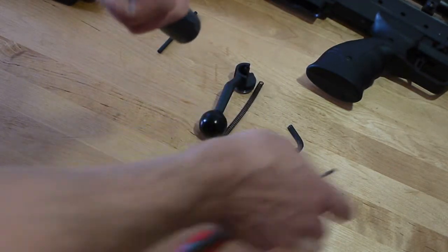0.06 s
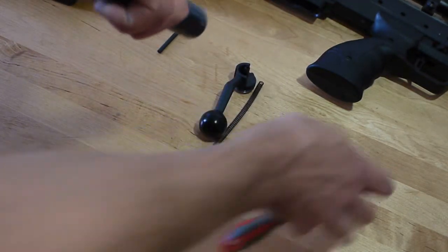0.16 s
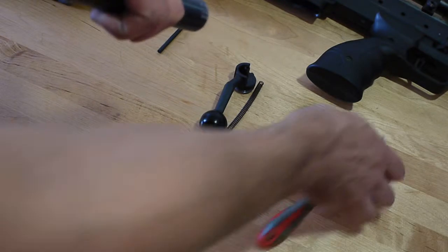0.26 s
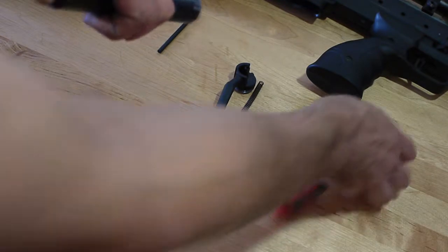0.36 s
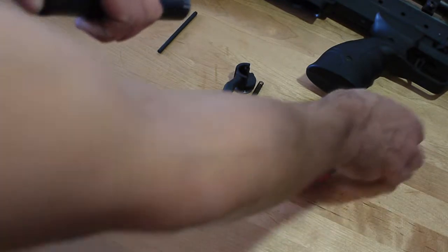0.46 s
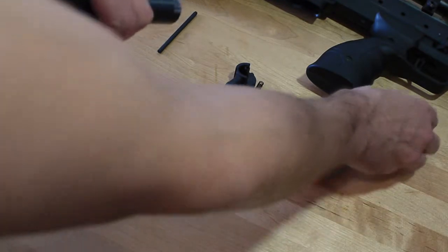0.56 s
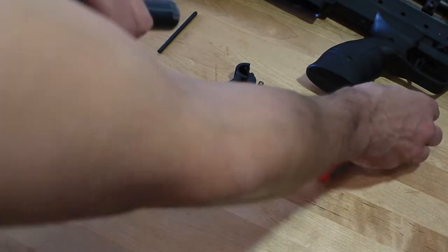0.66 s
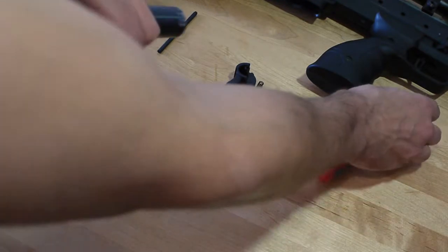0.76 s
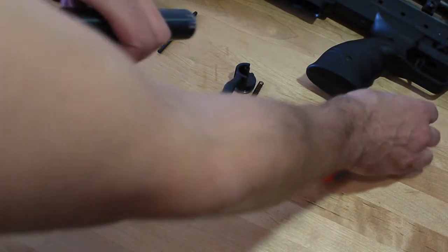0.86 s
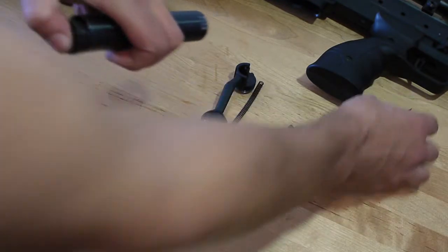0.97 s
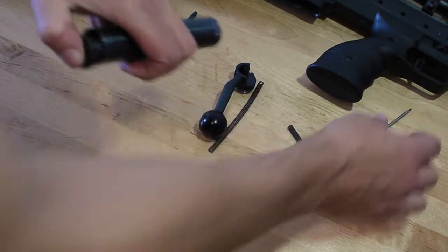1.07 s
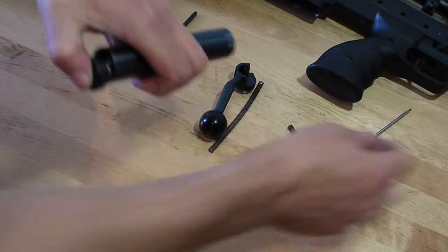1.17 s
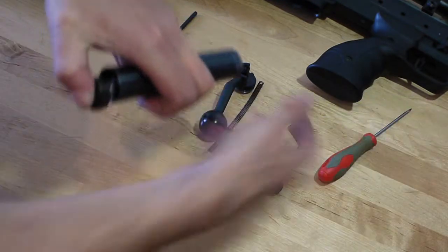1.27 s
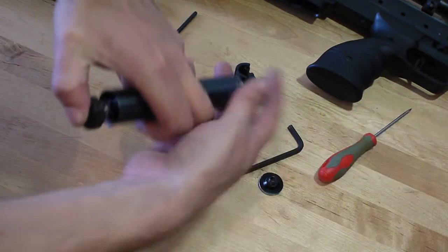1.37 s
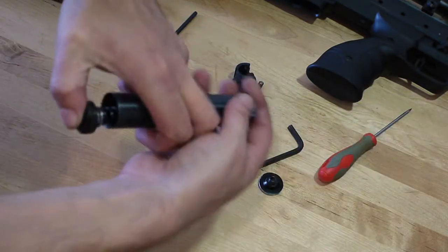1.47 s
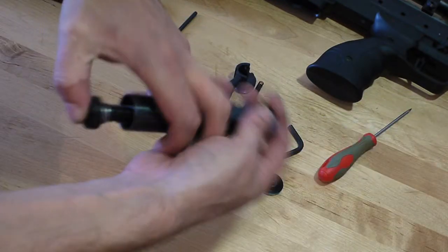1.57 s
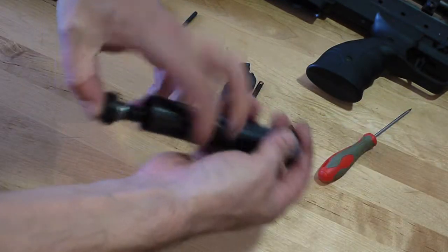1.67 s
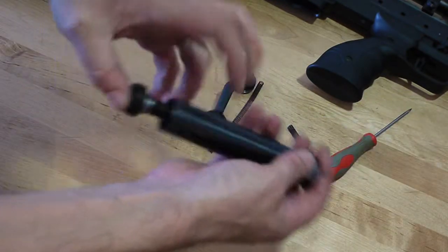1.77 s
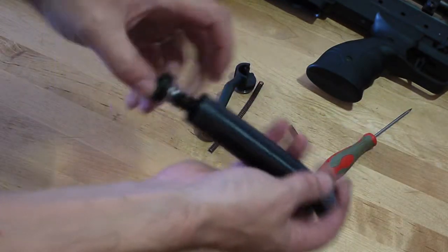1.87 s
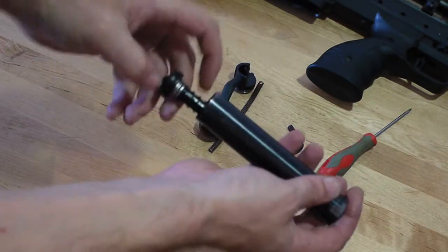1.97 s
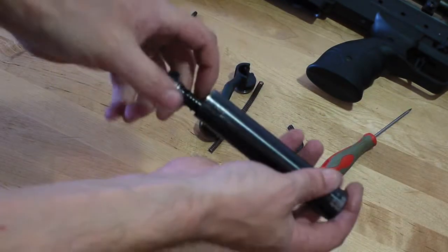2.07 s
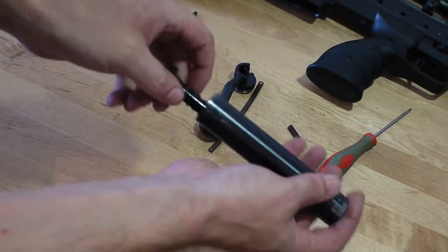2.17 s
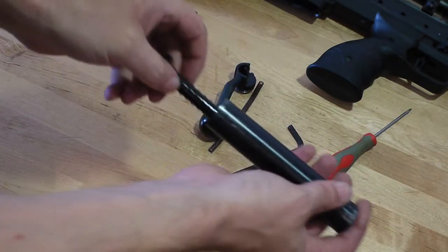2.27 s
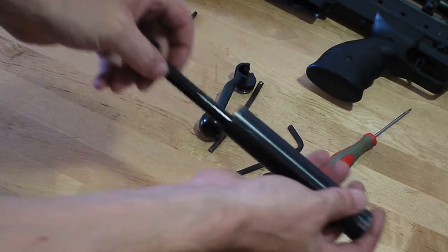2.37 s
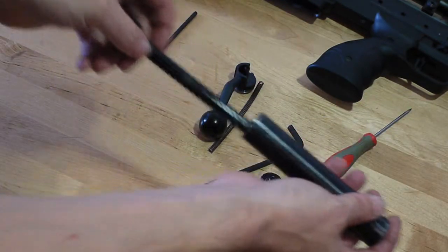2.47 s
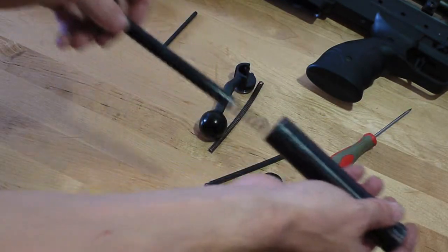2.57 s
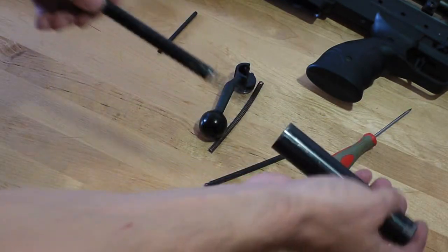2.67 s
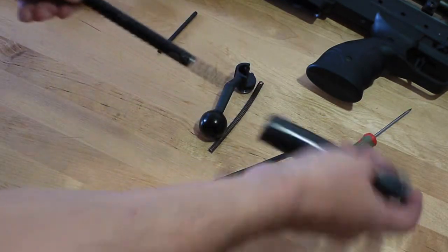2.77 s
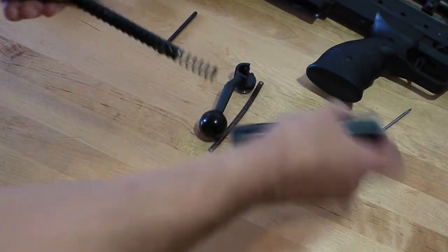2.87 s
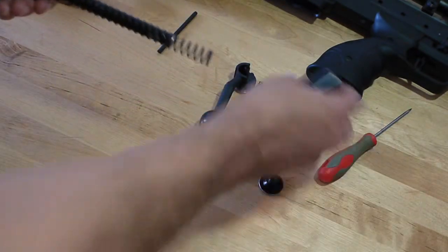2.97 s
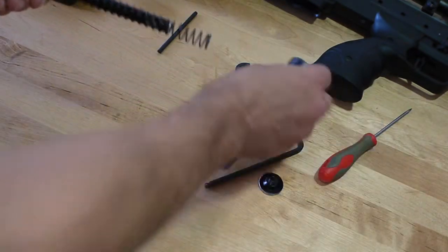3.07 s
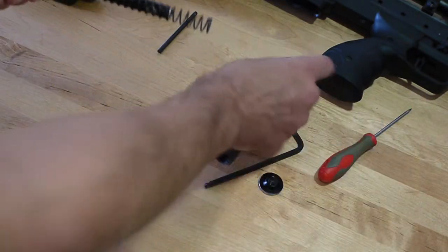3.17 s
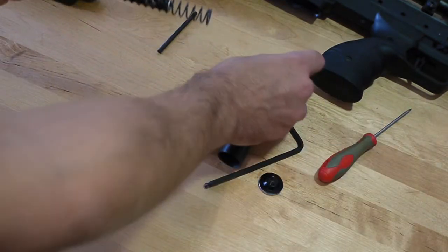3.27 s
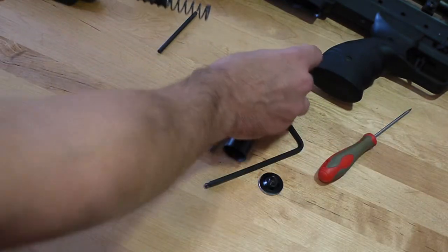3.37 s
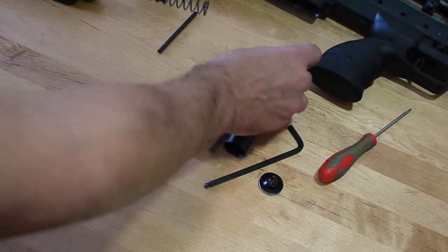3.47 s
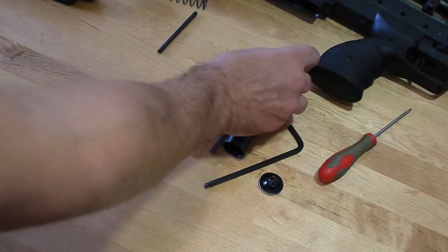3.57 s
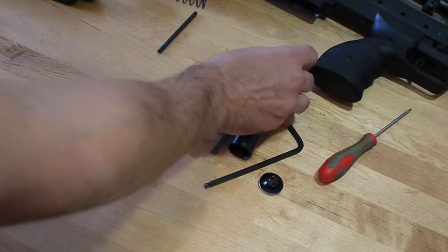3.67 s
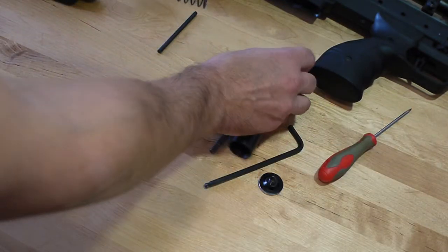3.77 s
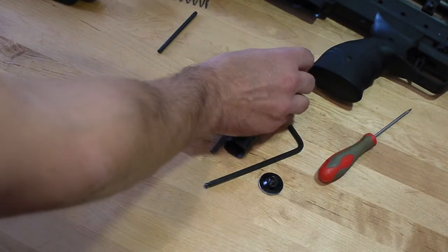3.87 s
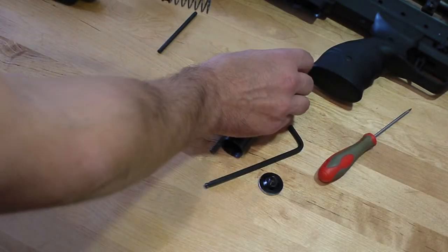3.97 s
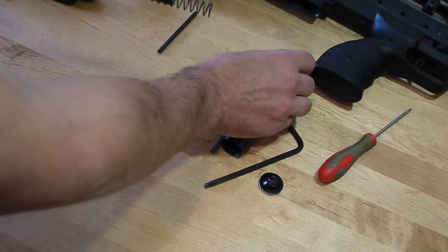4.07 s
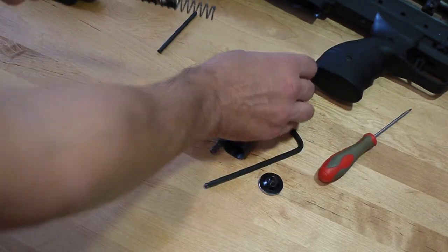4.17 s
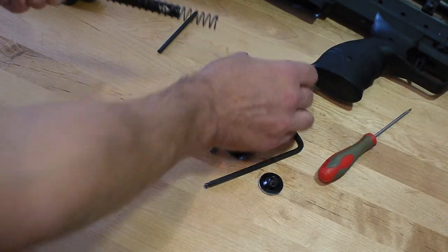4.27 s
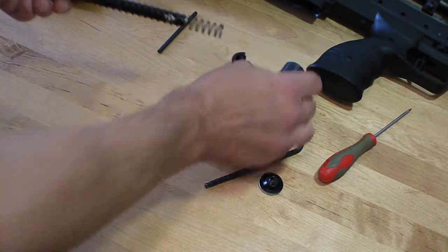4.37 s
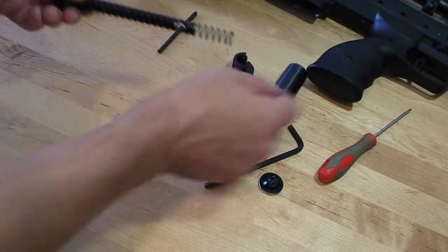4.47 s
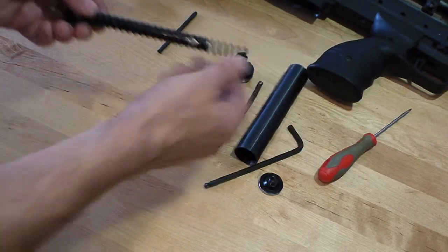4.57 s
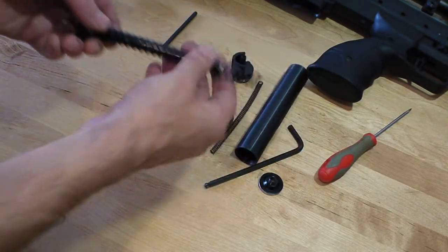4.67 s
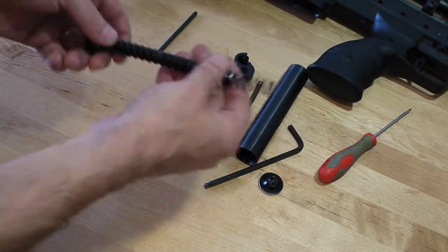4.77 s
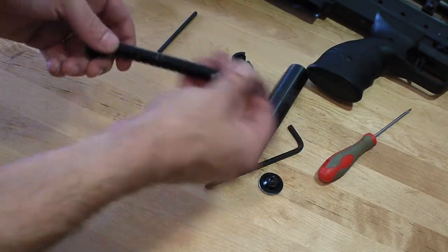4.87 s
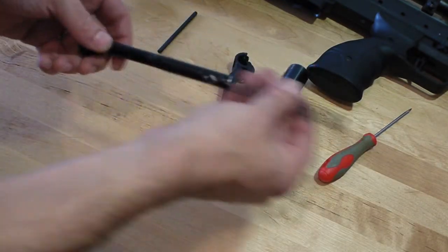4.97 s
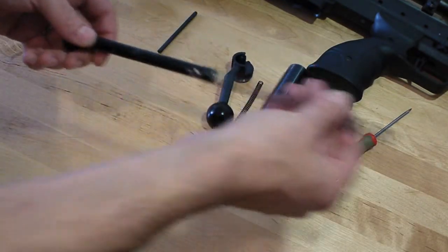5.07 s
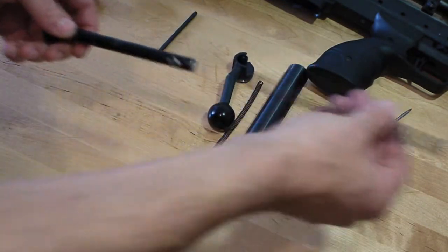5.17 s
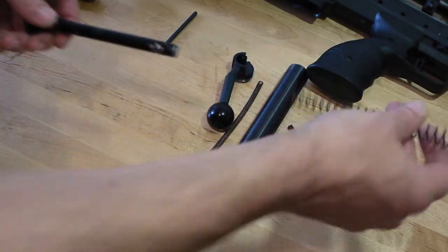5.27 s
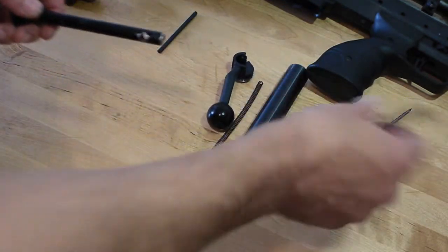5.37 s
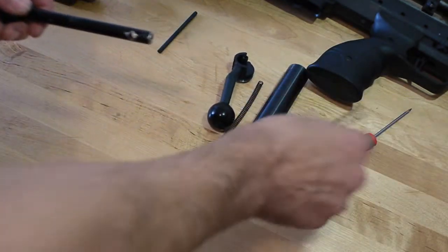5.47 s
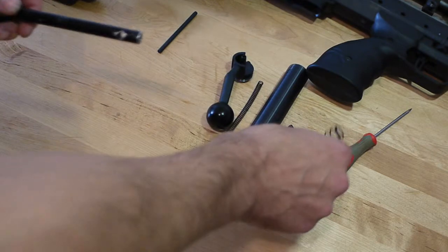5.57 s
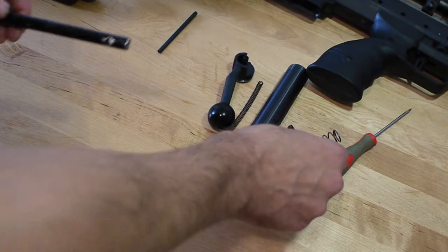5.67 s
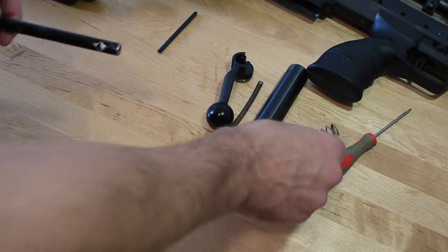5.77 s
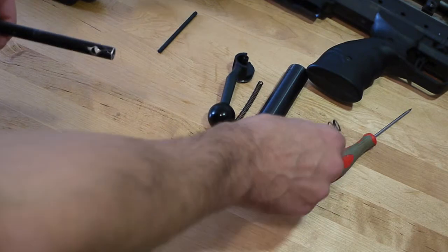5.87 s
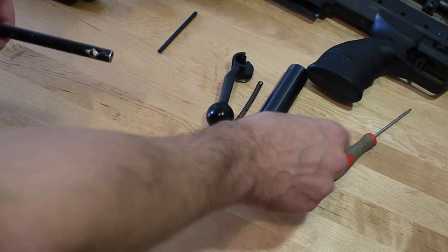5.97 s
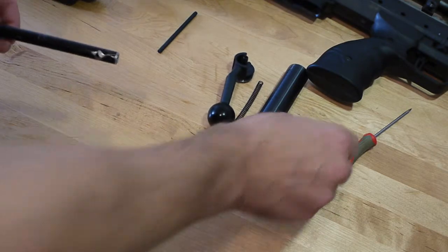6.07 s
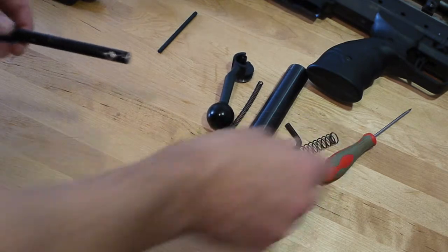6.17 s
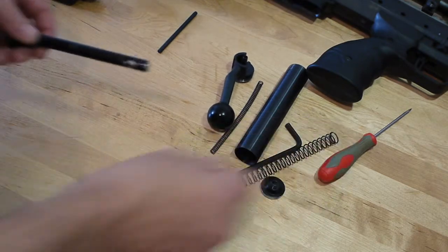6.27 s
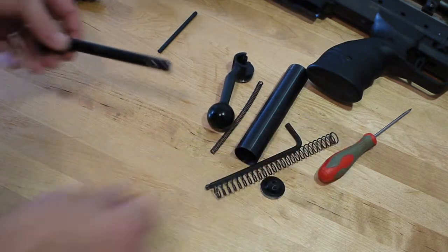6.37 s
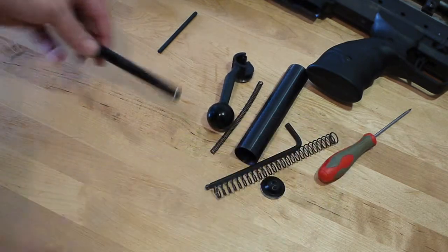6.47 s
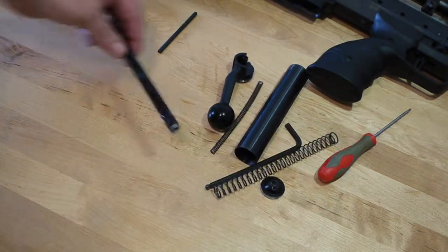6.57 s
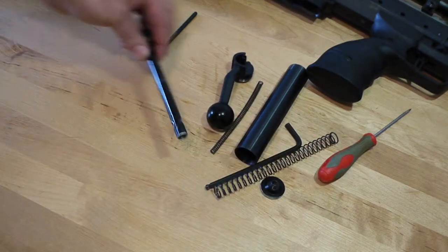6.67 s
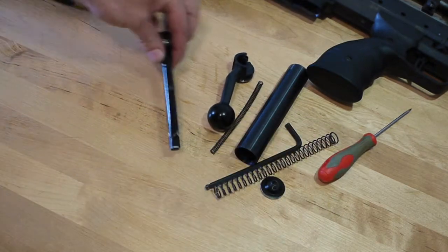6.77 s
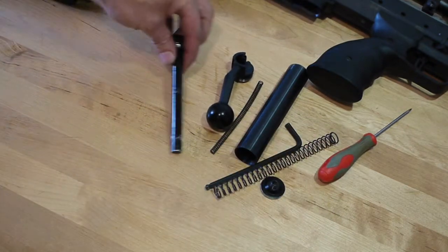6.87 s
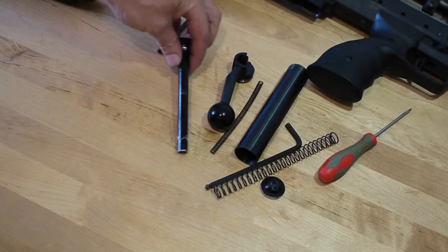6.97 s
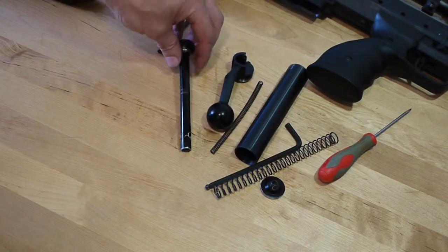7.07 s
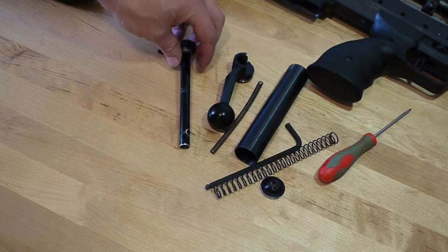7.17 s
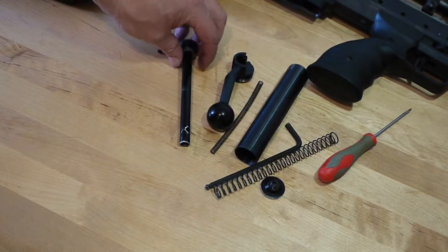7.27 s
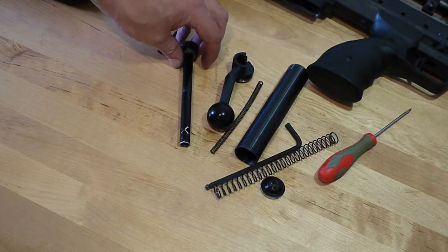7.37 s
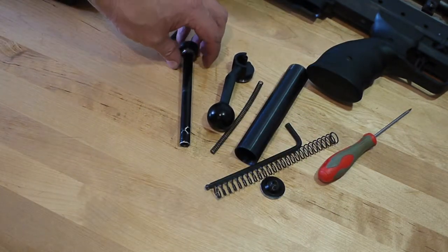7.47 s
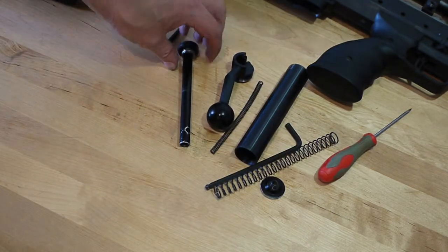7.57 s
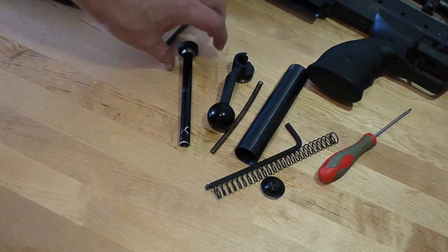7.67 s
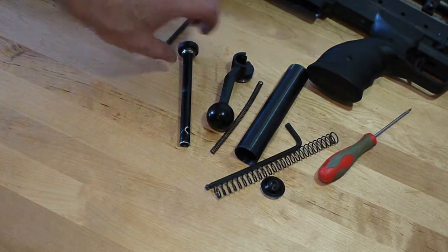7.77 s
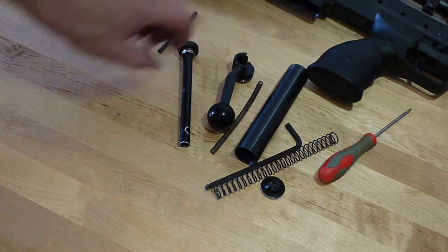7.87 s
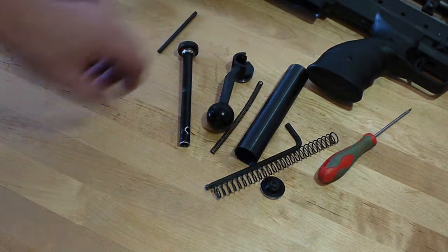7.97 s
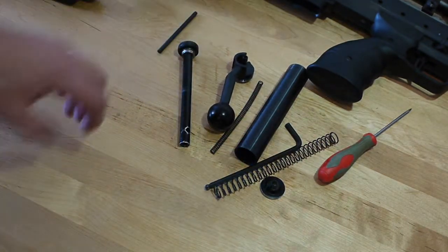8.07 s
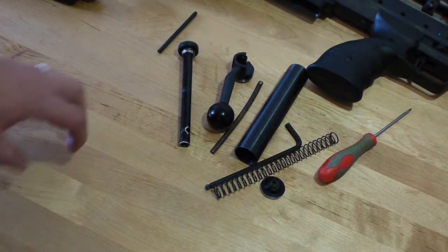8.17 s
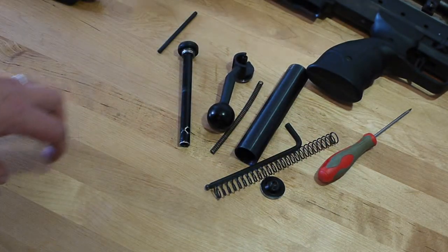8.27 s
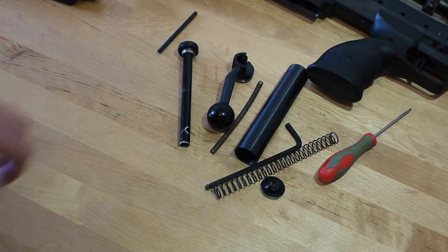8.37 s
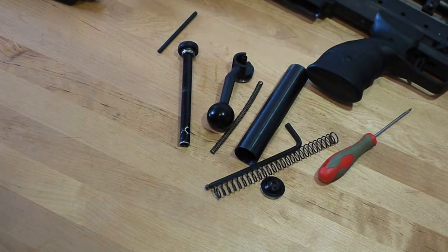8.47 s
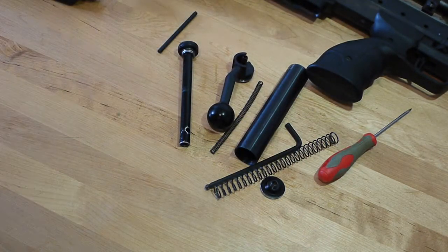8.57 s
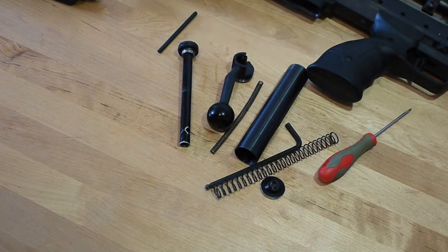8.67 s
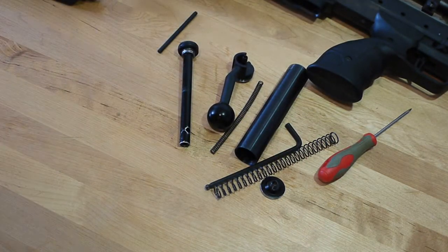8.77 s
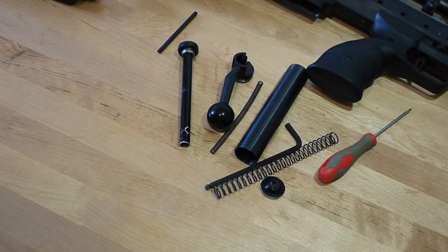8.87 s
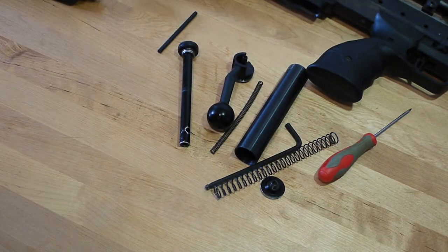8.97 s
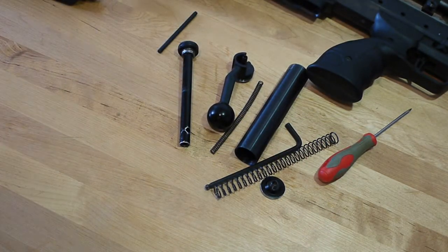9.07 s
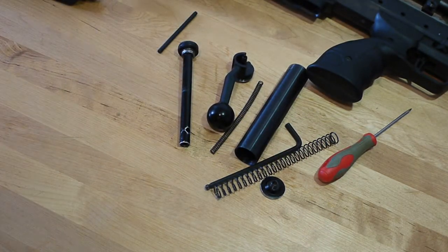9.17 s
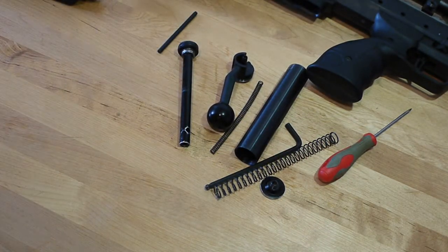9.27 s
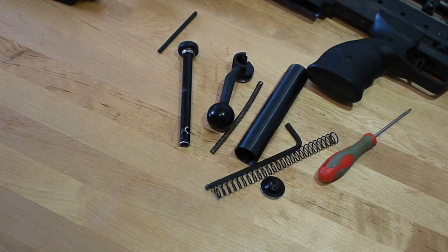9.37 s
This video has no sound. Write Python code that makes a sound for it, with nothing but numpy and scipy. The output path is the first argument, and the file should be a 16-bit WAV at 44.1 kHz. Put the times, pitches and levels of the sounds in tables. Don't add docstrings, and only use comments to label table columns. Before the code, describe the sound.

A small camera microphone with a narrow, slightly dull band and steady hiss picks up parts handled over a wooden table. Hard knocks with a short hollow ring open it, metallic snaps and high tube ringing follow, then a loud double knock of the tube, a rattling spring and quieter rod taps. Sleeve rustle, skin rubbing and tiny ticks fill the gaps, with short room reverberation.

```python
import sys
import numpy as np
from scipy import signal
from scipy.io import wavfile
from scipy.ndimage import uniform_filter1d

SR = 44100
rng = np.random.default_rng(int(sys.argv[2]) if len(sys.argv) > 2 else 0)


def voltage_ratio(decibels):
    exponent = np.asarray(decibels, float) / 20
    return 10 ** exponent


def put_to_file(sound):
    columns = np.atleast_2d(sound).T
    safe = np.clip(columns, -1, 1)
    whole_steps = np.round(safe * 32767)
    wavfile.write(sys.argv[1], SR, whole_steps.astype(np.int16))


N = 415863
STROKE_ENDS_DB = -18.5


def evened(x):
    return x / np.sqrt(np.mean(x ** 2) + 1e-20)


def matched(x, model):
    return x * np.linalg.norm(model) / np.linalg.norm(x)


def read(points, hz):
    f, value = np.transpose(points)
    return np.interp(np.log(hz + 1), np.log(f + 1), value)


def add(mix, start_s, sound):
    part = mix[round(start_s * SR):][:len(sound)]
    part += sound[:len(part)]


def band(x, low_hz, high_hz):
    sos = signal.butter(3, [low_hz, high_hz], "bandpass", fs=SR, output="sos")
    return evened(signal.sosfilt(sos, x))


def click(low_hz, high_hz):
    impulse = np.zeros(SR // 3)
    impulse[0] = 1
    return band(impulse, low_hz, high_hz)


def random_slips(size, per_s):
    return rng.standard_normal(size) * (rng.random(size) < per_s / SR)


def slow_wander(size, width):
    noise = rng.standard_normal((size, 2))
    return evened(uniform_filter1d(uniform_filter1d(noise, width, 0), width, 0)).T


def arch(length_s, top):
    size = length_s * SR
    return np.interp(np.arange(round(size)), [0, np.clip(top, .01, .99) * size, size], [-1, 0, 1])


def modes(table, size=SR // 3):
    hz, db, t60_s = np.transpose(table)[:, :, None]
    t = np.arange(size) / SR
    fade_out = np.minimum((size / SR - t) * 20, 1)
    dying = voltage_ratio(db - 60 * t / np.clip(t60_s, .004, .6))
    return dying * np.sin(2 * np.pi * hz * t) * np.minimum(t * hz, 1) ** 2 * fade_out


def rattle(length_s, first, per_s):
    t = np.arange(4000) / SR
    contacts = random_slips(len(t), per_s) * np.exp(-t / max(length_s, 3e-4))
    contacts[0] = first
    return contacts


def causal(gain_db):
    log_gain = np.log(voltage_ratio(np.concatenate([gain_db, gain_db[-2:0:-1]])))
    return np.fft.ifft(np.exp(np.conj(signal.hilbert(log_gain)))).real[:len(gain_db)]


def knocks(clear_db=-9, per_s=2000, room_tilt=-0.61, thin_db=-7, bounce_db=-3, count=170):
    # (start_s, peak_db, hardness_db per octave, rattle_s, first contact share 0-1)
    key = ([(100, -37), (314, -15), (366, -30), (450, 0.5), (872, -2.5), (1010, -5.5), (2600, -12.5),
           (7200, -49)], [(453, -12, 0.45), (520, -7, 0.14), (864, -3.5, 0.4), (1066, -21, 0.68),
           (1326, -15, 0.21), (1437, -15, 0.44), (1502, -15.5, 0.36), (1695, -9.5, .25), (1874, -19, 0.36),
           (2110, -19.5, 0.32), (2690, -24, 0.8)], [(0.295, -9.5, 4, 0.0038, 0.64),
           (0.313, -14, -2, 0.0045, 0.54), (0.361, -23.5, 5.5, 0.0036, 0.9)])
    handle_nudge = ([(120, -69), (200, -27), (436, -25), (529, -15), (623, 20), (2000, -36), (2600, -62),
                    (4400, -120)], [(425, 5.4, 0.37)], [(0.651, -48.5, -0.5, 0.018, 0.36),
                    (0.689, -53.5, 14, 0.015, 0.065)])
    handle = ([(131, -7), (165, -31), (442, -8), (538, -21), (643, -0.5), (2150, -14.5), (3000, -31),
              (7200, -54)], [(440, -8, 0.25), (870, -2, 0.26), (1400, -5, 0.38), (1096, -4.5, 0.3),
              (1770, -10, 0.39), (750, -5.5, 0.13), (1026, -22, .29), (1454, -3.5, 0.28), (1614, -11, 0.22),
              (1940, -7.5, .21)], [(0.848, -23, 2.5, 0.0059, 0.89), (0.864, -18.5, 1.5, 0.0031, 0.44),
              (0.877, -19.5, 0.1, 0.024, 0.89)])
    tube_end = ([(230, -36.5), (450, 2), (538, -8), (1050, -21.5), (1450, -20.5), (2200, -32), (3500, -34),
                (7200, -54)], [(450, -3, 0.45), (554, 1.5, 0.17), (646, -5, 0.29), (1418, -2, 0.24),
                (1020, -18, .3), (1590, -23.5, 0.35), (2697, -17, 0.27), (3560, -16, .12)],
                [(3.346, -39.5, -4, 0.008, 0.8), (3.361, -32, -1, 0.011, 0.03),
                (3.377, -28.5, 0, 0.049, 0.2), (3.427, -30.5, -4, 0.02, 0.5)])
    tube_nudge = ([(120, -59), (200, -18.5), (445, -7), (1030, -16), (1120, -35), (2000, -20), (2600, -61),
                  (4400, -120)], [(437, 3.4, 0.42)], [(3.778, -48.5, 0.34, 0.0081, 0.16),
                  (3.811, -46.5, -1, 0.015, 0.092)])
    tube_flat = ([(138, -21), (200, -25.5), (643, -1), (1100, -16), (1460, -4), (2000, -9), (2700, -21),
                 (7200, -45.5)], [(458.4, -6.5, 0.26), (854, -6.5, 0.12), (950, -10, .3), (1141, -16, 0.3),
                 (1372, -13, 0.33), (1397, -7.5, 0.3), (1489, -7, 0.25), (1530, -6, 0.27),
                 (1570, -20, 0.245), (1705, -17, 0.14), (1803, -22.5, .25), (1900, -6.5, .22),
                 (2186, -19, 0.32)], [(3.934, -19, -3, 0.02, 1), (3.966, -17.5, 3.7, 0.0067, 0.67),
                 (3.9775, -9, -0.5, 0.013, 0.62), (3.994, -15, 1.5, 0.019, 0.43)])
    tube_let_go = ([(140, -3.5), (230, -4.5), (299, 6), (366, 3.5), (700, 5.5), (1060, -9), (1500, -8.5),
                   (3500, -43)], [(851, -7, 0.11), (1383, -11, 0.29), (1510, -14, 0.34)],
                   [(4.581, -30, -0.052, 0.0056, 0.47), (4.597, -36.5, 2.6, 0.0066, 0.65)])
    spring = ([(376, -24.5), (442, -1.5), (560, -14.5), (826, -9), (2900, -8), (4400, -12), (5600, -13.5),
              (7200, -29)], [(827, -13.5, 0.35), (1500, -8.5, 0.24), (2696, -7, 0.19), (2810, -18, .25),
              (3208, -6, 0.14), (4260, -23, .1), (5259, -9.5, .15), (6266, -19, .1)],
              [(6.0475, -16, -0.7, 0.018, 0.27), (6.055, -13.5, 9, 0.0091, 0.88),
              (6.078, -17, -2.3, 0.012, 0.49), (6.106, -17.5, 0.5, 0.035, 0.47),
              (6.123, -22.5, -3, 0.014, 0.83), (6.16, -27, -1.5, 0.026, 0.66),
              (6.194, -28.5, -2, 0.042, 0.41), (6.224, -29, 2, 0.061, 0.5)])
    rod_end = ([(397, -18.5), (442, 5), (620, -16.5), (1440, -3), (2550, -20.5), (3900, -26), (4600, -33),
               (7200, -45)], [(445, -25, 0.73), (854, -11, 0.35), (1410, -0.5, 0.25), (1513, -3.5, 0.34),
               (740, -10, 0.34), (927, -6.5, 0.28), (1334, -4, 0.29), (2067, -18, .23)],
               [(6.935, -31, 1.1, 0.014, 0.96), (6.956, -31.5, 0.76, 0.016, 0.99),
               (6.968, -29, -0.86, 0.018, 0.34)])
    rod_flat = ([(100, -26.5), (769, -12.5), (856, -12.5), (1080, -15), (1660, -14), (2170, -27),
                (3990, -43), (7200, -50)], [(866, 0, 0.35), (1440, -4, 0.4), (1900, -27.5, 0.31),
                (666, -1.5, .1), (1125, -34, .15), (1580, -10, 0.24), (1830, -17, .26)],
                [(7.379, -29.5, -2.1, 0.0084, 0.55), (7.399, -29.5, -1.1, 0.0056, 0.55)])
    # pitch_hz, t60_s
    wood = [(140, 0.095), (450, 0.11), (1500, 0.026), (4000, 0.0063)]
    # pitch_hz, level_db
    table_colour = [(150, 7.5), (240, -3.5), (303, 6), (365, -5.5), (850, 2.5), (1060, 1), (1450, 2),
                    (2100, 1.9)]
    # pitch_hz, level_db, t60_s
    table_modes = [(305.5, -3.5, 0.14), (641, -10, 0.42), (1160, -11.5, 0.16), (1580, -12, 0.13),
                   (1753, -14.5, 0.23), (1976, -6, 0.6)]
    table_sway = (138, -8.5, 0.21)
    pair_share, pair_db = .013, -9
    laid_down = [key, handle_nudge, handle, tube_end, tube_nudge,
                 tube_flat, tube_let_go, spring, rod_end, rod_flat]

    near, far = np.zeros(N), np.zeros((3, N))
    fine_hz = np.fft.rfftfreq(4096, 1 / SR)
    for colour, clear, contacts in laid_down:
        shared = [(f, db + read(colour, f), t60) for f, db, t60 in table_modes + [table_sway]]
        pairs = [(f * (1 + pair_share * (-1) ** m), db + pair_db, t60 * 1.15)
                 for m, (f, db, t60) in enumerate(clear)]
        tones = clear + pairs + shared
        chime, chime_hz = modes(tones), np.transpose(tones)[0]
        for k, (start_s, peak_db, hardness, length_s, first) in enumerate(contacts):
            hz = np.geomspace(110, 7300, count) * rng.uniform(.99, 1.01, count)
            t60_s = read(wood, hz)
            train = rattle(length_s, first, per_s)
            share_db = read(colour, hz) + read(table_colour, hz) + hardness * np.log2(hz / 1000)
            share_db += 10 * np.log10(hz / t60_s)
            if k > 0:
                share_db += bounce_db * np.log2(np.maximum(hz / 2500, 1))
            body = rng.choice([-1, 1], count) @ modes(np.transpose([hz, share_db, t60_s]), size=4000)
            ring = signal.fftconvolve(train, body)
            scale = voltage_ratio(peak_db) / abs(ring).max()
            add(near, start_s, scale * ring)

            soft_db = .6 * min(hardness, 0) * np.log2(np.maximum(chime_hz / 700, 1))
            add(near, start_s, voltage_ratio(peak_db + clear_db + soft_db) @ chime)

            smooth_db = read(colour, fine_hz) + read(table_colour, fine_hz) + thin_db * (fine_hz < 200)
            smooth_db += (hardness + room_tilt) * np.log2(fine_hz / 1000 + 0.079)
            smooth = causal(np.maximum(smooth_db, -100))
            add(far[k % 3], start_s, scale * matched(smooth, ring))
    return near + voltage_ratio(-2) * room(far)


def ticks(out, far, clear_db=-4, per_s=1500, spot_db=3):
    # pitch_hz, level_db, t60_s
    boards = [(430, 9, 0.38), (640, 3, 0.14), (839, 5, 0.19)]
    table_top = [(1400, 1, 0.045), (1997, 5.5, 0.054)]
    contact_crack = [(2530, -3.5, 0.016), (3020, -4.5, 0.015), (3700, 2.5, 0.016)]
    steel = [(5130, 9.5, 0.021), (5600, -1.5, 0.032), (5850, 12.5, 0.014), (6150, -33.5, .012)]
    # low_hz, high_hz, t60_s
    rushes = [(386, 1190, 0.031), (1010, 2070, 0.014), (2130, 4400, 0.013), (5000, 5920, 0.0057)]
    # start_s, boards_db, table_top_db, crack_db, steel_db
    hard_clicks = [(0.009, -47.5, -54.5, -61, -69.5), (0.4492, -37.5, -38, -29, -34),
                   (0.472, -53.5, -34.5, -48, -34), (1.568, -58, -65, -47.5, -34.5),
                   (1.692, -53.5, -41, -32, -36), (1.935, -49, -46, -45.5, -30.5),
                   (2.1816, -53, -53, -38, -24), (2.446, -59, -77, -75, -53), (2.519, -56, -72, -45, -48),
                   (2.535, -76, -58, -53, -36), (2.58, -71, -49.5, -44.5, -33), (2.592, -72, -59, -62, -36)]
    # start_s, boards_db, table_top_db, crack_db, steel_db
    touches = [(3.674, -66, -72, -50, -55.5), (5.037, -70, -68, -54, -60), (5.067, -69, -72, -62, -67),
               (5.127, -64, -56, -49, -58), (5.853, -49, -71, -43.5, -48.5), (5.905, -58, -68, -48.5, -93),
               (7.7273, -52, -47.5, -47, -64), (8.557, -66, -57, -48, -66), (8.612, -66, -62, -42, -62),
               (8.785, -78, -53, -65, -66), (9.039, -70, -62, -48, -59), (9.187, -73, -64, -49, -60),
               (9.298, -67, -52, -49, -65)]

    bodies = [modes(b) for b in (boards, table_top, contact_crack, steel)]
    t = np.arange(SR // 3) / SR
    for k, (start_s, *levels_db) in enumerate(hard_clicks + touches):
        contacts = rattle(0.0025, 0.62, per_s)
        skin_db = -2.5 if k >= len(hard_clicks) else 0
        for body, (low_hz, high_hz, t60_s), level_db in zip(bodies, rushes, levels_db):
            spot = voltage_ratio(clear_db + skin_db + spot_db * rng.standard_normal(len(body)))
            spot = spot * rng.choice([-1, 1], len(body))
            rush = band(rng.standard_normal(len(t)), low_hz, high_hz) * voltage_ratio(-60 * t / t60_s)
            rush *= np.minimum(t * low_hz, 1) ** 2
            ring = signal.fftconvolve(contacts, spot @ body + rush)
            ring *= voltage_ratio(level_db) / abs(ring).max()
            add(out, start_s, ring)
            add(far[k % 3], start_s, voltage_ratio(4.0) * matched(click(low_hz, high_hz), ring))


def pings(out, far):
    # start_s, peak_db, pitch_hz, t60_s
    short_pings = [
        (0.4516, -21.5, 5850, 0.024),
        (1.599, -41, 6040, 0.048),
        (1.6165, -32, 5880, 0.027),
        (1.937, -35, 5790, 0.048),
        (2.424, -45.5, 5870, 0.03),
        (.4495, -27, 2580, 0.025),
        (.472, -31.5, 2050, 0.055),
        (2.5207, -60, 5640, 0.04),
                   (2.514, -38, 5100, 0.03), (2.52, -33, 5120, 0.04), (3.936, -32, 4100, 0.016),
                  (3.936, -40, 4500, .014), (3.978, -19, 3350, 0.034), (4.913, -50, 5470, 0.026),
                  (4.9671, -49, 5100, 0.02), (6.9367, -30, 3700, 0.014), (6.936, -35, 4160, 0.0099),
                  (6.958, -46, 3330, 0.077), (6.958, -43, 3600, .12), (6.956, -32.5, 3720, 0.019),
                  (6.9675, -39, 3800, 0.012), (7.3832, -37, 3920, 0.015), (9.041, -51, 5070, .03),
                  (9.047, -53, 2300, .02), (9.052, -48, 4520, 0.033), (9.073, -49, 4780, .02),
                  (9.286, -47, 2350, .02), (9.291, -59, 3100, .015), (9.302, -43, 1840, 0.027),
                  (7.7275, -53, 1760, .04)]
    spread = 0.094

    t = np.arange(SR // 3) / SR
    for start_s, peak_db, hz, t60_s in short_pings:
        ping = modes([(hz, peak_db, t60_s)])[0] * np.minimum(t / 0.0023, 1)
        add(out, start_s, ping)
        add(far[1], start_s, voltage_ratio(-1.5) * matched(click(hz * (1 - spread), hz * (1 + spread)), ping))


def shocks(out, far):
    # start_s, peak_db, low_hz, high_hz
    bare_shocks = [(0.299, -33, 1800, 6500), (0.4492, -36, 1910, 6500), (0.472, -23, 1600, 4500),
                   (1.692, -38, 1810, 4600), (2.181, -43, 2500, 6500), (2.1808, -24.5, 600, 5500),
                   (2.5347, -30, 1900, 6800), (2.5816, -35, 1810, 6500), (3.9788, -11, 300, 2000),
                   (3.9345, -21, 300, 1600), (4.58, -44, 302, 2000), (0.472, -25.5, 5000, 7200),
                   (0.4525, -27.5, 5000, 7220), (6.9354, -40, 500, 3000), (6.9358, -35, 3040, 4360),
                   (6.9553, -36, 3040, 4300), (7.3836, -37.5, 3000, 4500), (5.1265, -47, 2260, 5200),
                   (6.056, -25, 2400, 6800), (6.0773, -23, 2500, 6800), (6.088, -22, 1500, 4500),
                   (6.113, -26, 3500, 6800), (6.129, -36, 3500, 6800), (6.162, -23, 1800, 5000),
                   (6.225, -33, 2470, 6800), (7.379, -31, 300, 2200), (7.7292, -40, 400, 5000),
                   (8.612, -39, 2000, 5000), (8.617, -47, 2000, 4500), (8.666, -43, 800, 4000),
                   (8.7213, -37, 1800, 4000)]
    for start_s, peak_db, low_hz, high_hz in bare_shocks:
        shock = click(low_hz, high_hz)
        add(out, start_s, voltage_ratio(peak_db) * shock / abs(shock).max())
        add(far[0], start_s, voltage_ratio(peak_db - 1.0) * shock / abs(shock).max())


def small_contacts():
    out, far = np.zeros(N), np.zeros((3, N))
    ticks(out, far)
    pings(out, far)
    shocks(out, far)
    return out + voltage_ratio(-5.5) * room(far)


def tube(waver=0.35, drift_hz=20):
    # start_s, peak_db, rise_s, t60_s
    strikes = [(1.5, -67, 0.0082, 0.2), (1.57, -44, 0.068, 0.15), (1.691, -47, 0.013, 0.24),
               (1.933, -33, 0.0035, 0.08), (1.968, -51, 0.01, 0.098), (1.95, -56, 0.024, .7),
               (2.186, -44, 0.013, 0.18), (2.205, -49, 0.016, 0.044), (2.232, -46, 0.011, 0.083),
               (2.285, -57.5, .012, 0.61), (2.424, -50, 0.011, 0.15), (2.446, -45.5, 0.0051, 0.047),
               (2.46, -59, 0.017, .4), (2.51, -46.5, 0.0091, 0.054), (2.533, -39, 0.014, 0.43),
               (2.57, -30.5, 0.0077, 0.036), (2.586, -38.5, 0.019, 0.088), (2.612, -41, 0.011, 0.28),
               (2.63, -41, 0.0216, 0.22), (2.72, -60, 0.025, 0.3), (3.934, -55, 0.0024, 0.43),
               (3.966, -52, .005, .15), (4.0, -62, 0.017, .4), (4.08, -57, 0.018, 0.27),
               (4.16, -67, 0.018, 0.18)]
    ring_hz, twin_hz, twin_db = 5233, 5200, -14

    power, t = np.zeros(N), np.arange(SR) / SR
    for start_s, peak_db, rise_s, t60_s in strikes:
        rise = np.minimum(t / rise_s, 1) ** 2
        fall = voltage_ratio(peak_db - 60 * np.maximum(t - rise_s, 0) / t60_s)
        add(power, start_s, (rise * fall) ** 2)
    grip, drift = slow_wander(N, 350)
    turns = np.cumsum(ring_hz + drift_hz * drift) / SR
    twin = voltage_ratio(twin_db + 1.5 * grip) * np.sin(2 * np.pi * turns * twin_hz / ring_hz)
    return np.sqrt(2 * power) * (np.sin(2 * np.pi * turns) + twin) * (1 + waver * grip)


def coils():
    length_s = .25
    out, size = np.zeros(N), round(length_s * SR)
    skips = random_slips(SR, 1300)[:size] * (1 - 0.6 * abs(arch(length_s, 0.82)))
    ringing = signal.fftconvolve(skips, modes([(2670, 0, .028)])[0])
    add(out, 4.895, voltage_ratio(-65) * ringing / np.sqrt(np.mean(ringing[:size] ** 2)))
    return out


def drags(t60_s=0.048, per_s=3000):
    # start_s, length_s, peak_db, share of the length to the peak 0-1
    slides = [
        (0.402, 0.082, -42, 0.2),
        (3.437, 0.18, -51, 0),
        (5.845, 0.081, -58, 0),
        (7.14, 0.12, -58.5, 0.44),
        (7.253, 0.11, -57, 0.2),
        (8.455, 0.097, -62, .5),
    ]
    # pitch_hz, level_db
    humming_boards = [(310, -3), (455, -1), (650, -4), (850, -1), (1400, -6.5)]

    push = np.zeros(N)
    for start_s, length_s, peak_db, top in slides:
        add(push, start_s, voltage_ratio(peak_db + STROKE_ENDS_DB * arch(length_s, top) ** 2))
    hum = modes([(hz, db, t60_s) for hz, db in humming_boards], size=4000).sum(0)
    slips = random_slips(N, per_s) * np.sqrt(SR / per_s)
    return signal.oaconvolve(push * slips, hum / np.linalg.norm(hum))[:N]


def squeak(flutter_db=3):
    # start_s, pitch_hz, level_db
    squeak_paths = [
        [(2.968, 2950, -80), (2.98, 2970, -71), (2.998, 3020, -69), (3.03, 2930, -72), (3.05, 2915, -73),
         (3.08, 3020, -73), (3.105, 3060, -80)],
        [(3.125, 3150, -82), (3.145, 3320, -73), (3.19, 3370, -72), (3.22, 3270, -74), (3.245, 3140, -73),
         (3.28, 3120, -80)],
    ]
    octave_levels = [-8, -14]

    out = np.zeros(N)
    for path, octave_db in zip(squeak_paths, octave_levels):
        s, hz, db = np.transpose(path)
        t = np.arange(s[0], s[-1], 1 / SR)
        grip = slow_wander(SR // 2, 400)[:, :len(t)]
        turn = 2 * np.pi * np.cumsum(uniform_filter1d(np.interp(t, s, hz), 400)) / SR
        tone = voltage_ratio(flutter_db * grip[0] / 2) * np.sin(turn)
        tone += voltage_ratio(octave_db + flutter_db * grip[1]) * np.sin(2 * turn)
        swell = voltage_ratio(np.interp(t, s, db)) * signal.windows.tukey(len(t), .15)
        add(out, s[0], np.sqrt(2) * tone * swell)
    return out


def rustle(per_s=14000, size_db=3.0):
    # start_s, length_s, peak_db, share of length to the peak 0-1, treble_db
    strokes = [(0, 0.19, -60.5, 0, -5), (0.153, 0.14, -64, 0.94, -13), (0.414, 0.081, -41, 0.73, -10),
               (0.423, 0.061, -62.5, 0.35, 14), (0.928, 0.11, -55.5, 0.4, -38),
               (1.006, 0.31, -61, 0.07, -5), (2.415, 0.092, -72.5, 0.1, 13.5),
               (2.5, 0.16, -62.5, 0.12, 7.5), (2.947, 0.19, -69, 0.2, -3), (3.117, 0.3, -67, 0.17, -7),
               (4.85, 0.47, -68, 0.14, 3.5), (5.849, 0.026, -62, 0.05, -2), (5.87, 0.14, -78, 0, 3.5),
               (7.084, 0.27, -65, 0.4, 0), (8.405, 0.4, -54.5, 0.66, -3), (8.783, 0.14, -57.5, 0.03, -0.5),
               (8.888, 0.42, -65, 0.4, -1), (9.03, 0.066, -70, .15, 0), (9.165, 0.092, -64, 0.37, -1),
               (9.213, 0.16, -61.5, 0.26, -4.5)]

    slips = random_slips(N, per_s) * voltage_ratio(size_db * np.minimum(rng.exponential(1, N), 4))
    dull, bright = np.zeros((2, N))
    for start_s, length_s, peak_db, top, treble_db in strokes:
        power = voltage_ratio(peak_db + STROKE_ENDS_DB * abs(arch(length_s, top)) ** 1.38) ** 2
        add(dull, start_s, power)
        add(bright, start_s, power * voltage_ratio(treble_db) ** 2)
    return np.sqrt(dull) * band(slips, 1300, 3770) + np.sqrt(bright) * band(slips, 4200, 6280)


def room(x, gap_s=0.0012, build_s=0.011):
    # pitch_hz, t60_s
    room_decay = [(100, 0.39), (260, 0.47), (700, 0.34), (1840, 0.48), (4850, 0.39)]

    taps = np.zeros((3, SR))
    at = np.arange(0, SR - 20, 20) + rng.integers(0, 20, (3, SR // 20 - 1))
    np.put_along_axis(taps, at, rng.choice([-1., 1.], at.shape), 1)
    hz, t, z = signal.stft(taps, SR, nperseg=256)
    z = z * voltage_ratio(-60 * t / read(room_decay, hz)[:, None])
    tails = signal.istft(z, SR, nperseg=256)[1][:, :SR]
    tails *= np.clip((np.arange(SR) / SR - gap_s) / build_s, 0, 1)
    return signal.fftconvolve(x, tails / np.linalg.norm(tails[0]), axes=1)[:, :N].sum(0)


def hiss(patchy_db=0.9, low_swell_db=0.7):
    # pitch_hz, level_db per Hz
    hiss_colour = [(20, -36), (92, -8.5), (300, -5), (560, -6.5), (1700, -12.5), (4790, -20), (6440, -25),
                   (7290, -37)]

    frames, hz = N // 256 + 5, np.fft.rfftfreq(1024, 1 / SR)
    a, b, patches = rng.standard_normal((frames, 513, 3)).T
    patches = evened(uniform_filter1d(uniform_filter1d(patches, 10, 0), 12, 1))
    swell = evened(uniform_filter1d(rng.standard_normal(frames), 16)) * (hz[:, None] < 1200)
    level_db = read(hiss_colour, hz)[:, None] + patchy_db * patches + low_swell_db * swell
    noise = signal.istft((a + 1j * b) * voltage_ratio(level_db), nperseg=1024, noverlap=768)[1][:N]
    return voltage_ratio(-59.5) * evened(noise)


def scene():
    low_cut = signal.butter(6, 112, "highpass", fs=SR, output="sos")
    struck = signal.sosfilt(low_cut, knocks() + small_contacts())
    return (struck + tube() + coils() + drags() + squeak() + rustle() + hiss())[None]


def band_limit(x):
    return signal.sosfilt(signal.butter(12, 7440, fs=SR, output="sos"), x)


def record(dry):
    power_db = 10 * np.log10(abs(uniform_filter1d(dry[0] ** 2, 600)) + 1e-12)
    fall_db = np.arange(N) * 47.0 / SR
    held_db = np.maximum.accumulate(power_db + fall_db) - fall_db
    over_db = np.maximum(held_db + 70.0, 0)
    ducked = dry / voltage_ratio(0.051 * uniform_filter1d(over_db, 300))
    voice_band = signal.firwin(301, 7147, window=("kaiser", 9), fs=SR)
    narrow = signal.oaconvolve(ducked, voice_band[None], "same")
    return band_limit(narrow)


dry = scene()
out = record(dry)
put_to_file(out)
```